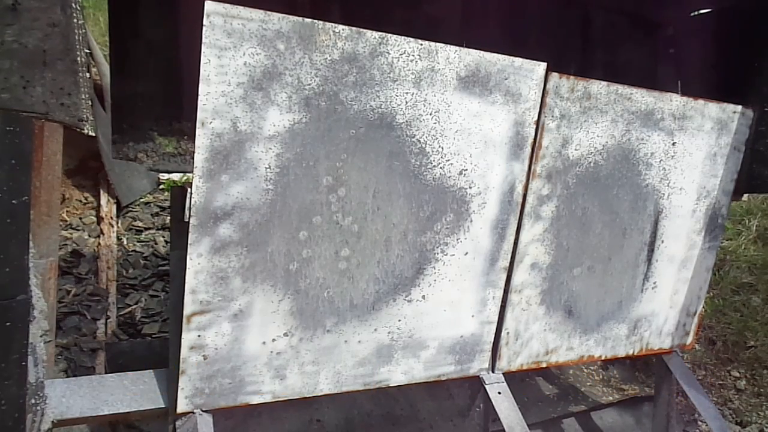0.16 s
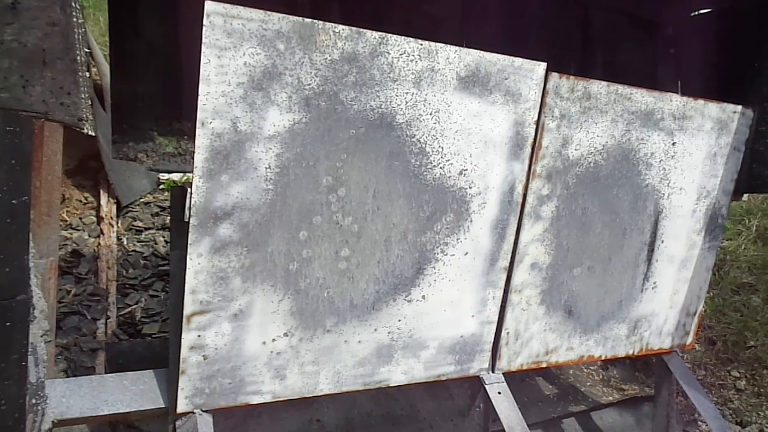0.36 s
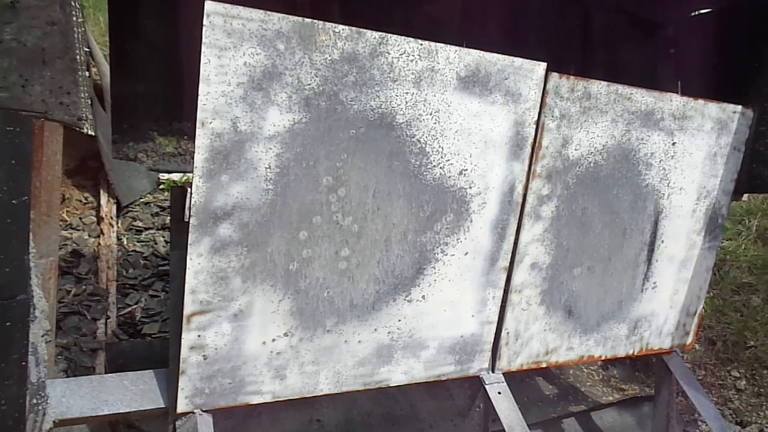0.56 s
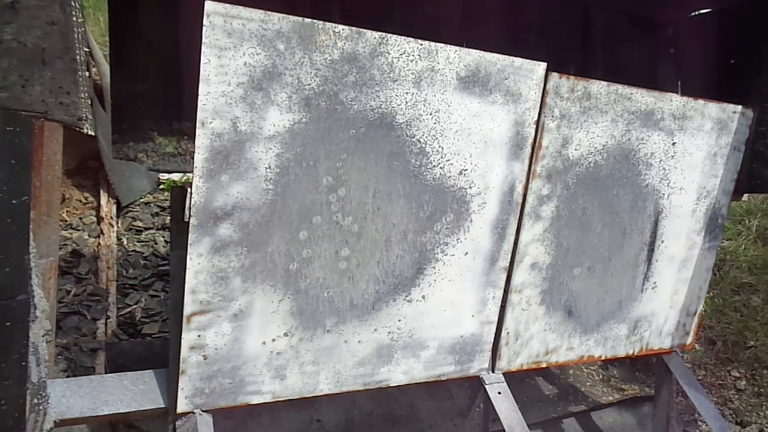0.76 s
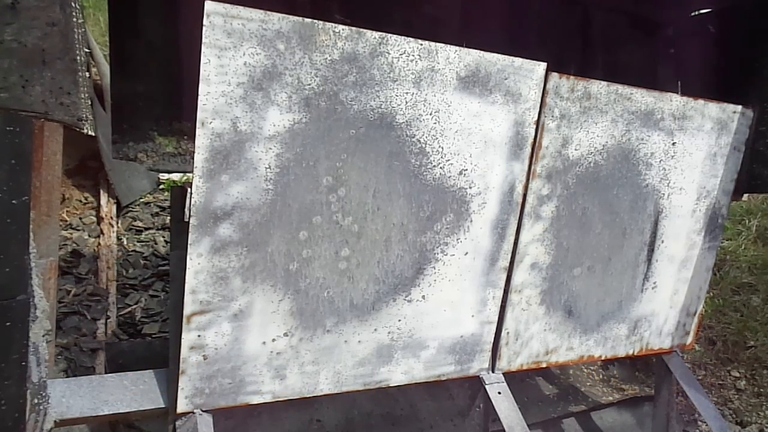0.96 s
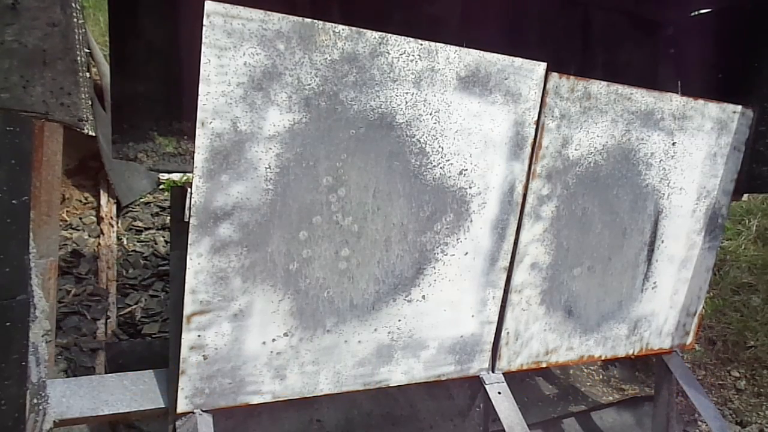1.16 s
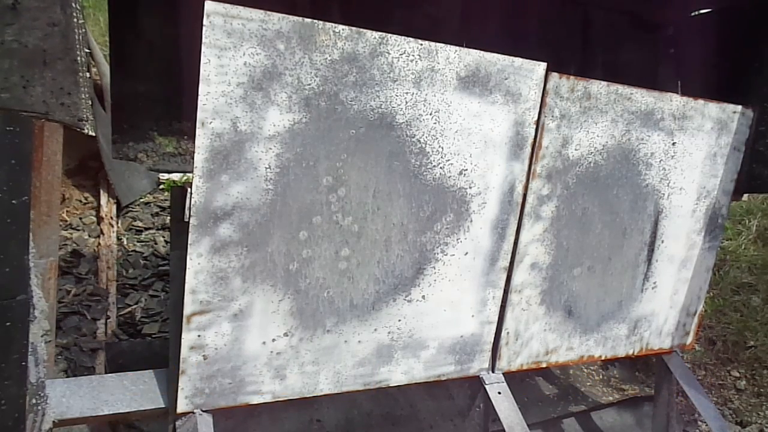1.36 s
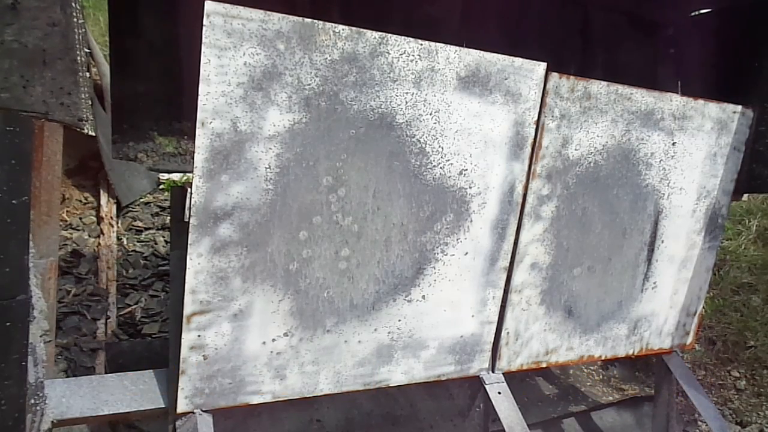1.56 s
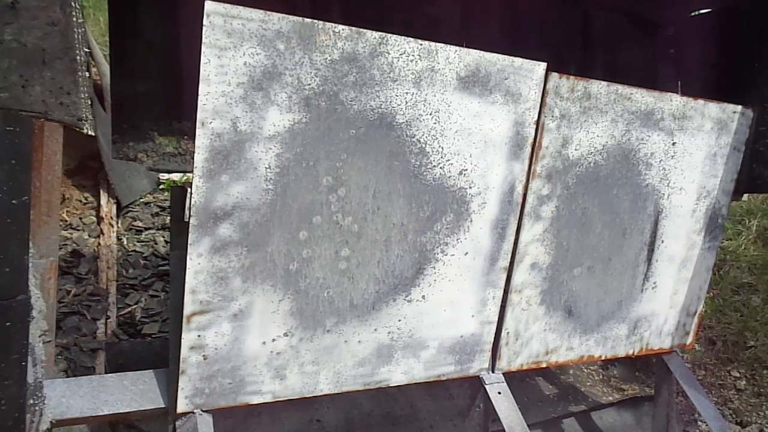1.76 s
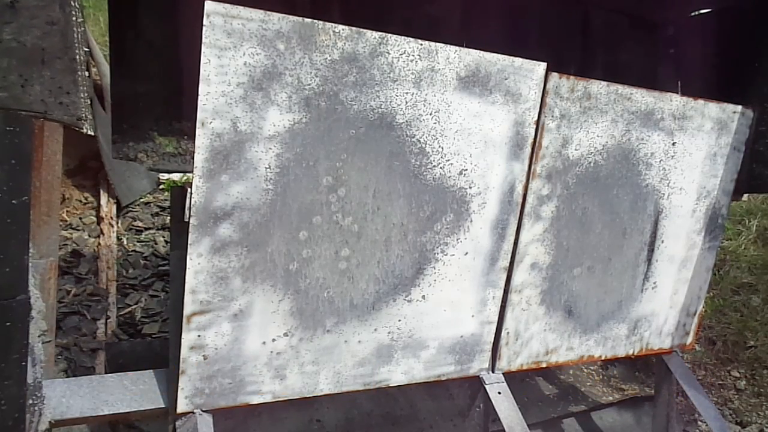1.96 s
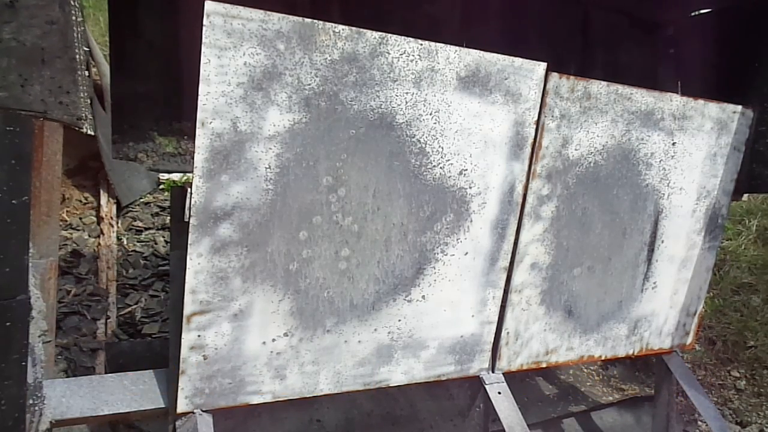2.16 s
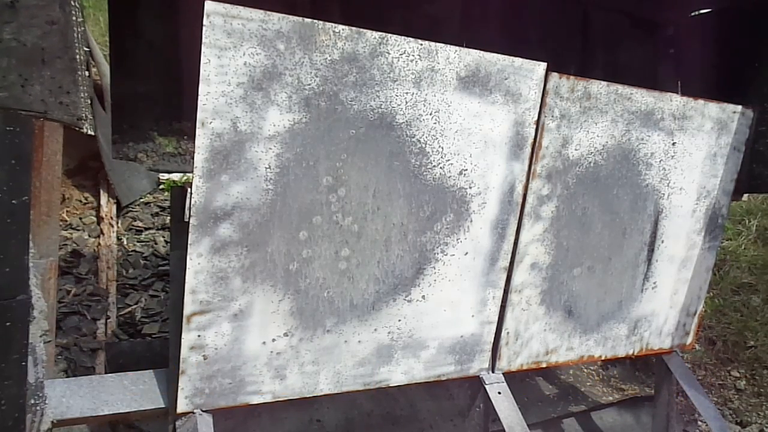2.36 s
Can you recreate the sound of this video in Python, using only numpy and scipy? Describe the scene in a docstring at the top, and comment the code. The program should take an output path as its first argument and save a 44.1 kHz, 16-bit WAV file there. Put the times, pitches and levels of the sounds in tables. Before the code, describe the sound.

Three revolver shots blast, each instantly crashing into steel plates that ring on with a clang

```python
"""Revolver shots against steel plates

Revolver shots at an outdoor range are heard from beside thick steel plates. Each blast, tapered noise with
a wandering hollow note, booms through the steel trap and overloads the microphone. A moment later the bullet
strikes: splashing noise and many weak modes crash, a dull echo follows and the plate rings as decaying sines.
The gain control ducks after each shot and recovers, so the long low ring swells."""
import sys
import numpy as np
from scipy import signal
from scipy.fft import rfft, irfft
from scipy.io import wavfile
from scipy.ndimage import uniform_filter1d

SR = 44100
rng = np.random.default_rng(int(sys.argv[2]) if len(sys.argv) > 2 else 0)


def level_to_linear(level):
    """Convert decibel levels to linear amplitude factors, elementwise."""
    exponent = np.asarray(level, float) / 20
    return 10 ** exponent


def transcribe(signal):
    """Save signal, clipped to [-1, 1], as a 16-bit WAV file at the path in sys.argv[1]."""
    frames = np.atleast_2d(signal).T
    limited = np.clip(frames, -1, 1)
    pcm = np.round(limited * 32767).astype(np.int16)
    wavfile.write(sys.argv[1], SR, pcm)


N = 110250  # samples in the scene

# The shots. Each row: time of the blast in seconds, delay from blast to strike in seconds.
SHOT_TIMES = [(.2009, .034), (1.0271, .033), (1.8356, .034)]


def evened(x):
    """Normalises a signal to unit rms, so that a later gain sets its level."""
    return x / np.sqrt(np.mean(x ** 2) + 1e-20)


def read(points, hz):
    """Interpolates a table of (Hz, value) linearly over logarithmic frequency."""
    table_hz, value = np.transpose(points)
    return np.interp(np.log(hz + 1), np.log(table_hz + 1), value)


def add(mix, start_s, sound):
    """Superposes a sound on the mix from its start time, cut off at the end of the mix."""
    part = mix[round(start_s * SR):][:len(sound)]
    part += sound[:len(part)]


def coloured(x, points):
    """Linear filtering in the frequency domain: multiplies the spectrum by a table of gains in dB."""
    hz = np.fft.rfftfreq(len(x), 1 / SR)
    return irfft(rfft(x) * level_to_linear(read(points, hz)), len(x))


def noise_floor():
    """Stationary background: Gaussian noise shaped by a fixed spectrum."""
    # Spectrum of the floor. Each row: frequency in Hz, relative level in dB.
    spectrum = [(30, -22.5), (120, -13), (250, -7), (600, -2.5), (1200, -13.5), (3000, -22), (6000, -33.5),
                (9000, -37), (16000, -46.5)]
    floor_db = -42.5  # rms
    return level_to_linear(floor_db) * evened(coloured(rng.standard_normal(N), spectrum))


def wash():
    """Diffuse reverberation: a long dull echo from the range, as exponentially decaying noise."""
    # Spectrum of the echo. Each row: frequency in Hz, relative level in dB.
    spectrum = [(150, -16), (400, 4), (1500, -1.5), (3500, -7), (6000, -27.5), (12000, -51)]
    start_db, t60_s = -23, 1  # start level relative to the strike's gain
    t = np.arange(SR) / SR
    return evened(coloured(rng.standard_normal(SR), spectrum)) * level_to_linear(start_db - 60 * t / t60_s)


def splash(spectrum):
    """Frequency-dependent damping: lead splashes on steel as noise that dies band by band."""
    # Decay of the noise. Each row: frequency in Hz, time to fall by 60 dB in seconds.
    decay = [(300, 0.29), (1500, 0.28), (4000, 0.47), (8000, 0.38), (15000, .15)]
    frames = {"nperseg": 256, "noverlap": 192}
    hz, t, bands = signal.stft(rng.standard_normal(SR), SR, **frames)
    bands = bands * level_to_linear(read(spectrum, hz)[:, None])
    steady = signal.istft(bands, **frames)[1]
    bands = bands / np.sqrt(np.mean(steady ** 2))
    fade = level_to_linear(-60 * t / read(decay, hz)[:, None])
    noise = signal.istft(bands * fade, **frames)[1][:SR // 2]
    low_cut = signal.butter(N=4, Wn=220, btype="high", fs=SR, output="sos")
    return signal.sosfilt(low_cut, noise)


def dense_modes(spectrum):
    """High modal density: a thicket of short weak modes as damped sines of random pitch and phase."""
    count, total_db = 400, -2.5  # total: summed rms of the modes before they decay
    place, turn, weakness, damping = rng.random((count, 4)).T[:, :, None]
    hz = 400 + 14000 * place ** 1.7  # crowded towards the low end
    t60_s = 0.48 * (0.21 + damping)
    t = np.arange(SR // 2) / SR
    height = level_to_linear(read(spectrum, hz) + 5 * np.log10(hz) - 8.2 * weakness)
    modes = height * level_to_linear(-60 * t / t60_s) * np.sin(2 * np.pi * (hz * t + turn))
    return level_to_linear(total_db) * modes.sum(0) / np.sqrt((height ** 2).sum() / 2)


def crash():
    """Broadband impact: the splash of lead and the plate's dense weak modes superposed."""
    # Spectrum of the impact. Each row: frequency in Hz, relative level in dB.
    spectrum = [(88, -45), (150, -10), (646, -14), (896, -3.5), (1690, -5), (1900, -5.5), (4860, -12.5),
                (5150, -11.5), (13200, -23), (14800, -29.5)]
    return splash(spectrum) + dense_modes(spectrum)


def ring():
    """Modal vibration: each strike stops the old ring and starts every damped plate mode anew."""
    # Frequencies of the plates' modes in Hz.
    mode_hz = np.array([231.8, 242.2, 310.3, 460.8, 484.3, 497.8, 504.3, 539.0, 541.4, 625.6, 643.2, 655.1,
                        677.5, 681.3, 694.2, 705.3, 793.8, 855.1, 861.3, 871.2, 873.4, 896.2, 1024.0,
                        1085.0, 1141.8, 1242.4, 1432.1, 1721.5, 1829.5, 1895.8, 2057.1, 2157.0, 2266.5,
                        2584.7, 2634.6, 3328.1, 3354.5, 3378.2, 3660.5, 3722.0, 3829.0, 4121.0, 4127.8,
                        4212.4, 4298.7, 4625.5, 4640.5, 5122.8, 5134.9, 5155.4, 5343.8, 5595.3, 5696.2,
                        5854.8, 6271.4, 6868.9, 6928.1, 7176.8, 7487.8, 8033.6, 8236.1, 8973.6, 9485.4,
                        11672.2, 11760.5, 12449.4, 13423.1, 14041.2])[:, None]
    # The same modes. Each row: time to fall by 60 dB in seconds, then the initial rms level in dB
    # after the earlier strike and after each of the three strikes.
    modes = np.array([(5.9, -47, -42.5, -41, -40.5), (4.14, -44.5, -41, -37, -39.5),
                      (7.1, -60, -46.5, -37.5, -34.5), (1.2, -25, -18, -19, -22),
                      (8.0, -50, -42, -33, -44.5), (8.0, -37.5, -35, -51.5, -44),
                      (2.7, -28.5, -29.5, -26.5, -27), (2.1, -40.5, -22.5, -14.5, -19),
                      (12, -39.5, -35, -37.5, -60), (2.84, -34, -21, -15, -24),
                      (7.15, -55.5, -37, -41, -36.5), (5.8, -26.5, -34.5, -25, -24.5),
                      (1.8, -21, -18.5, -17.5, -34), (2.29, -43.5, -40.5, -36.5, -33.5),
                      (2.4, -25, -24.5, -24.5, -46.5), (4.25, -37.5, -31.5, -50.5, -34),
                      (1.8, -27, -18.5, -16.5, -17), (4, -18.5, -24, -9.5, -13), (7.23, -36, -38, -56, -65),
                      (1.11, -19.5, -10.5, -1, -3.5), (24, -28.5, -22.5, -21.5, -19.5),
                      (1.64, -10.5, -7.5, -14.5, -16), (0.89, -7, -4, -7, -11.5),
                      (1.1, -48, -26, -25.5, -15), (1.77, -14, -8, -3.5, -1.5),
                      (0.86, -6.5, -0.5, -1.5, -10), (0.46, 2, -1.5, -3, -28.5),
                      (0.63, -20, -14.5, -6.5, -8.5), (0.83, -25, -16.5, -13.5, -9),
                      (0.65, -17.5, -12.5, -12, -10), (0.51, -22.5, -7.5, -5, -2.5),
                      (0.29, -14, -4, -9.5, 1), (0.53, -20, -4, -4, -4),
                      (1.024, -30.5, -20.5, -11.5, -13.5), (0.22, -21, 3, 2.5, -12),
                      (0.56, -26, -21, -10.5, -7), (0.32, -8, -2.5, 5, 6.5), (0.18, -22, -9.5, -7.5, -7),
                      (0.99, -26.5, -27, -21.5, -11.5), (0.6, -17, -6.5, -12.5, -6),
                      (0.58, -32.5, -13.5, -13.5, -17), (0.39, -9.5, -5.5, 1, 0),
                      (0.65, -19, -27.5, -7, -12.5), (0.6, -46.5, -9.5, -38.5, -4.5),
                      (0.84, -29, -15, -15.5, -10.5), (0.77, -17.5, -13, -13, -6.5),
                      (0.76, -24, -21.5, -8.5, -10.5), (0.79, -26, -32, -27.5, -14),
                      (0.45, -27.5, -22.5, -15.5, -15.5), (0.77, -18.5, -15.5, -8, -10.5),
                      (0.55, -15.5, -10.5, -4.5, -15), (0.58, -33, -13, -28, -13.5),
                      (0.74, -20, -12.5, -5, -9), (0.32, -17, -4, -10, 0), (0.97, -40, -26.5, -23.5, -21.5),
                      (0.49, -28, -17, -8.5, 2), (0.53, -18, -11.5, -13, -5.5),
                      (0.65, -22, -19.5, -16, -17.5), (0.73, -36.5, -28.5, -25.5, -18.5),
                      (0.56, -20, -31.5, -18.5, -15), (0.73, -51, -27.5, -38, -13.5),
                      (0.42, -57, -54.5, -24, -6.5), (0.53, -42.5, -20.5, -33, -12.5),
                      (0.7, -40, -26, -20, -22.5), (0.49, -33, -27.5, -33.5, -14.5),
                      (0.55, -39, -34, -19, -21), (0.31, -22, -28, -18, -12.5),
                      (0.3, -34, -17.5, -17.5, -14)])
    # Modes that swing the opposite way at the struck spot, in Hz.
    inverted_hz = [541.4, 855.1]
    earlier_strike_s = -0.58  # before the scene begins
    t60_s = modes[:, [0]]
    sign = np.where(np.isin(mode_hz, inverted_hz), -1, 1)
    t, out = np.arange(N) / SR, np.zeros(N)
    strikes = [earlier_strike_s] + [blast_s + delay for blast_s, delay in SHOT_TIMES] + [N / SR]
    for k, (start, end) in enumerate(zip(strikes, strikes[1:])):
        now = (t >= start) & (t < end)
        since = t[now] - start
        envelope = sign * level_to_linear(modes[:, [1 + k]] - 60 * since / t60_s)
        swing = envelope * np.sin(2 * np.pi * mode_hz * since)
        out[now] = np.sqrt(2) * swing.sum(0)  # rms to peak
    return out


def blast():
    """Impulsive source with early echoes: held, then decaying noise and a note of wandering frequency."""
    # Spectrum of the boom. Each row: frequency in Hz, relative level in dB.
    spectrum = [(60, -25.5), (200, -16.5), (350, -7), (520, -0.5), (900, -1.5), (1400, -4), (3000, -15),
                (8000, -22.5), (16000, -29)]
    # The hollow note wanders as echoes arrive. Each row: time after the blast in seconds, frequency in Hz.
    note_path = [(0, 1200), (.0015, 460), (.006, 540), (.0095, 1150), (.011, 880), (.014, 1250),
                 (.017, 950), (.020, 620), (.023, 850), (.025, 750), (.030, 950), (.045, 900)]
    hold_s, boom_t60_s = 0.021, 0.1
    note_db, note_t60_s = 2, 0.025  # peak level relative to the boom's rms
    t = np.arange(SR // 2) / SR
    late = np.maximum(t - hold_s, 0)
    boom = evened(coloured(rng.standard_normal(len(t)), spectrum))
    note_hz = np.interp(t, *np.transpose(note_path))
    note = np.sin(2 * np.pi * np.cumsum(note_hz) / SR)
    return boom * level_to_linear(-60 * late / boom_t60_s) + note * level_to_linear(note_db - 60 * late / note_t60_s)


def stereo(mid):
    """Decorrelation: a short decaying noise filter turns the mid signal into a weaker side signal."""
    # Stereo width. Each row: frequency in Hz, gain from mid to side in dB.
    width = [(60, -29), (150, -19.5), (400, -22.5), (800, -33), (1500, -21.5), (3000, -21.5), (8000, -17.5),
             (14000, -13.5)]
    taps = rng.standard_normal(400) * np.exp(-np.arange(400) / 80)
    spread = signal.oaconvolve(mid, taps / np.linalg.norm(taps))[:N]
    side = coloured(spread, width)
    return np.array([mid + side, mid - side])


def scene():
    """Superposition of the sources: floor, ring, and for each shot one blast, crash and echo."""
    # Gains of the shots. Each row: gain of the blast in dB, gain of the crash and its echo in dB.
    shot_gains = [(16, 6.5), (18, 10), (18, 12)]
    mid = ring() + noise_floor()
    boom = blast()  # alike for every shot from the same stand
    for (blast_s, delay), (blast_db, crash_db) in zip(SHOT_TIMES, shot_gains):
        add(mid, blast_s, level_to_linear(blast_db) * boom)
        add(mid, blast_s + delay, level_to_linear(crash_db) * crash())
        add(mid, blast_s + delay, level_to_linear(crash_db) * wash())
    return stereo(mid)


def gain_control(x):
    """Dynamic range limiting: power over a knee ducks the gain, which recovers at a steady rate."""
    knee_db, detect_s, attack_s = -20, 0.045, 0.028
    still_ducked_db, recover_db_per_s = 0.5, 28  # ducking left over at the start
    power = np.minimum((x ** 2).mean(0), 1)
    power_db = 10 * np.log10(abs(uniform_filter1d(power, round(detect_s * SR))) + 1e-12)
    fall = np.arange(N) * recover_db_per_s / SR
    held_db = np.maximum.accumulate(power_db + fall) - knee_db
    over_db = np.maximum(np.maximum(held_db, still_ducked_db) - fall, 0)
    r = np.exp(-1 / (attack_s * SR))
    duck_db = signal.lfilter([1 - r], [1, -r], over_db, zi=[r * over_db[0]])[0]
    return x / level_to_linear(duck_db)


def gain_clicks():
    """Low-frequency transients: faint low clicks of the gain control, as Gaussian bumps at set times."""
    # The clicks. Each row: centre in seconds, peak level in dB.
    clicks = [(.586, -39), (1.376, -38), (2.102, -35.5)]
    width_s = 0.0021  # from the centre to 1/e of the peak
    t = np.arange(N) / SR
    return sum(level_to_linear(db) * np.exp(-((t - s) / width_s) ** 2) for s, db in clicks)


def overload(x):
    """Saturation: a memoryless curve, nearly straight up to its ceiling, flattens the peaks."""
    ceiling, hardness = 0.97, 21  # a higher exponent bends more sharply
    x = x / ceiling
    return ceiling * x / (1 + abs(x) ** hardness) ** (1 / hardness)


def roll_off(x):
    """The treble ends steeply here."""
    return signal.sosfilt(signal.butter(12, 14980, fs=SR, output="sos"), x)


def record(dry):
    """Recording chain: gain control, low cut, faint low clicks, overload and band limit in series."""
    x = gain_control(dry)
    low_cut = signal.butter(N=2, Wn=70, btype="high", fs=SR, output="sos")
    x = signal.sosfilt(low_cut, x)
    x = overload(x + gain_clicks())
    band_limit = signal.firwin(511, 15000, window=("kaiser", 7), fs=SR)
    x = signal.oaconvolve(x, band_limit[None], "same")
    return roll_off(np.clip(x, -1, 1))


dry = scene()
out = record(dry)
transcribe(out)
```